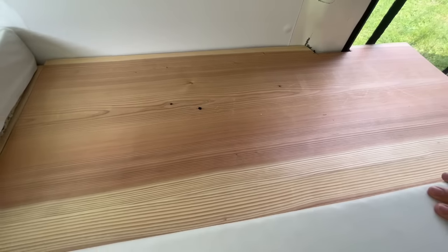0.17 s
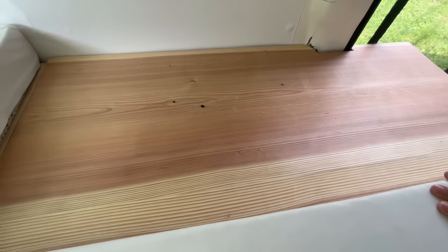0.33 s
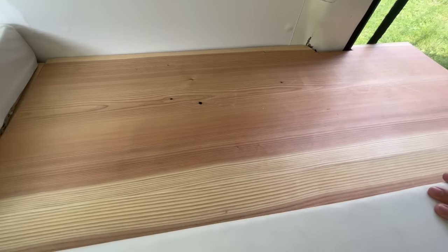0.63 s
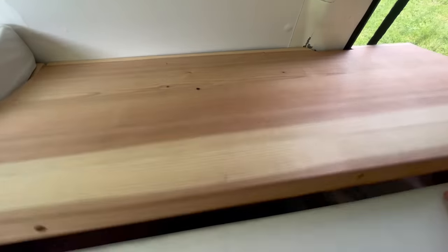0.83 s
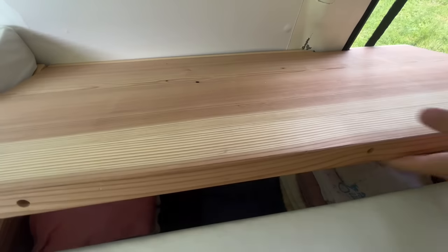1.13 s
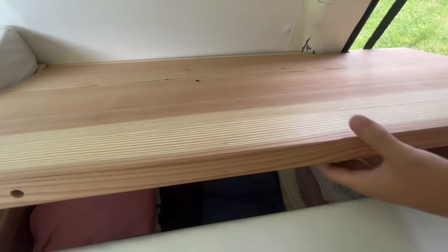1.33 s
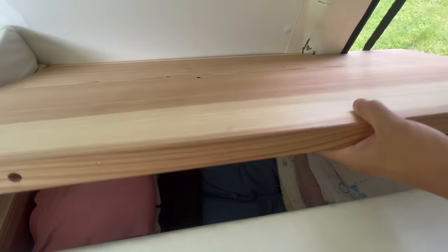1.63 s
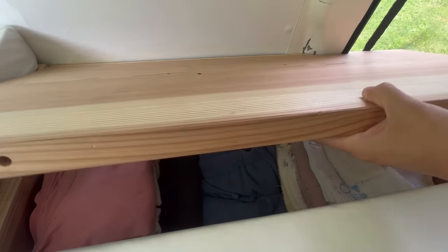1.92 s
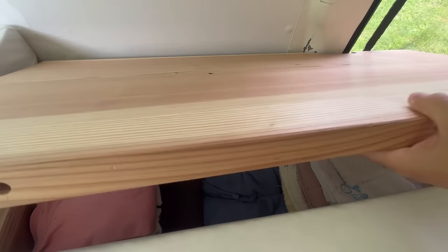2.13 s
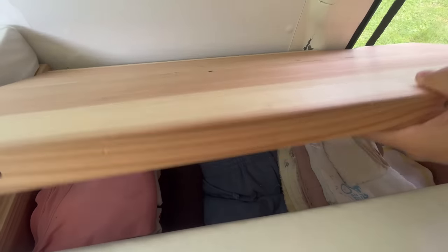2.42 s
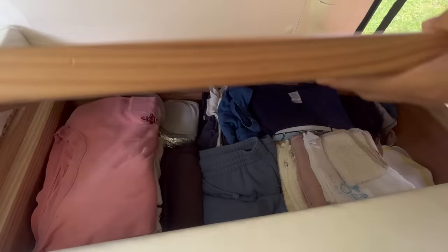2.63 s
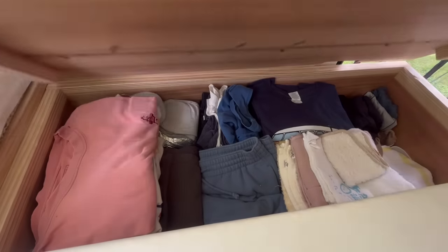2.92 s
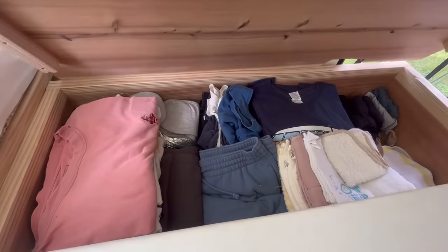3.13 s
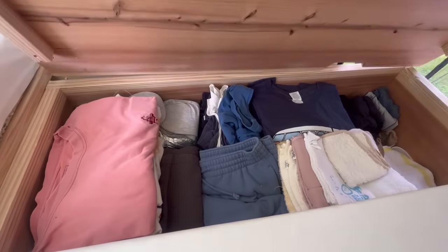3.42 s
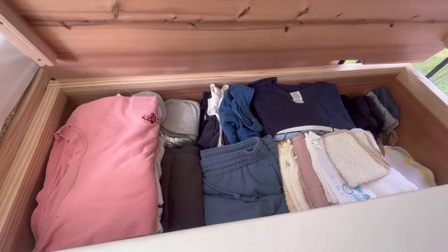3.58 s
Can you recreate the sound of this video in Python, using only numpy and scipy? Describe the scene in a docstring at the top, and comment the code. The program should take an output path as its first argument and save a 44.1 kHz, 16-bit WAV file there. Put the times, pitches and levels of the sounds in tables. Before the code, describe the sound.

A wooden storage lid clacks, bumps upward and knocks loudly against its stop in a small cabin

```python
"""Inside a small van, a pine storage lid is lifted. It clacks twice on its frame, a cushion slides and squeaks,
then the board bumps its way up and knocks against its stop. Blows are struck modes, noise bands that die away,
a falling bending-wave sweep and a boom of cabin air; squeaks and hinge are gliding chirps, sliding is
coloured noise. A high hiss and a low handling rumble lie underneath; a limiter ducks overloads."""
import sys
import numpy as np
from scipy import signal
from scipy.fft import rfft, irfft
from scipy.io import wavfile
from scipy.ndimage import uniform_filter1d, minimum_filter1d

SR = 44100
rng = np.random.default_rng(int(sys.argv[2]) if len(sys.argv) > 2 else 0)


def digitize_waveform(pressure):
    """Quantize a signal to 16-bit integers and store it at the path in sys.argv[1].

    Rows of a 2-D input are taken as channels; values are limited to [-1, 1].
    """
    field = np.atleast_2d(pressure).T
    bounded = np.clip(field, -1, 1)
    quanta = np.round(bounded * 32767).astype(np.int16)
    wavfile.write(sys.argv[1], SR, quanta)


N = 165375
T = np.arange(N) / SR


def amp(db):
    """Decibels to gain."""
    return 10 ** (np.asarray(db) / 20)


def unit(x):
    """Scale to rms 1."""
    return x / np.sqrt(np.mean(x ** 2) + 1e-20)


def at_hz(table, hz, axis=1):
    """Read a column on a log-frequency axis."""
    table = np.array(table)
    return np.interp(np.log(np.maximum(hz, 1)), np.log(table[:, 0]), table[:, axis])


def curve(table):
    """Read a level curve as gain over time."""
    return amp(np.interp(T, *np.transpose(table)))


def add(out, start_s, x):
    """Mix a sound in at a time."""
    i = max(int(start_s * SR), 0)
    out[:, i:i + x.shape[1]] += x[:, :N - i]


def pan(left_minus_right_db):
    """Left and right gains, half the difference each."""
    return amp(np.array([[.5], [-.5]]) * left_minus_right_db)


# microphone's leaning to the left: [f/Hz, left minus right/dB]
MIC_LEAN = [(70, 3.5), (180, -5.5), (350, 2), (700, 2.5), (1400, 1.5), (2800, 0), (5500, 10.5), (7500, 1.5),
            (9300, -12.5), (12000, 5.5), (15000, -2)]


def lean(hz):
    """Left minus right level of the microphone in dB at a frequency."""
    return at_hz(MIC_LEAN, hz)


RIGHT_LAG_S = 0.000439


def ear_times(delay_s):
    """Half a second of time since arrival at each microphone port."""
    return np.maximum(T[:SR // 2] - delay_s - np.array([[0], [RIGHT_LAG_S]]), 0)


# left-right likeness of noise: [f/Hz, likeness 0..1]
NOISE_LIKENESS = [(60, 0.86), (200, 0.85), (600, 0.3), (2000, 0.15), (12000, 0.13)]


def noise(left_db, right_db=None):
    """Stereo noise from spectra given as functions of frequency; alike in the bass, rms 1."""
    hz = np.fft.rfftfreq(N, 1 / SR)
    mid, side = rfft(rng.standard_normal((2, N)))
    alike = np.clip(at_hz(NOISE_LIKENESS, hz), 0, 1)
    mid = mid * np.sqrt(1 + alike)
    side = side * np.sqrt(1 - alike)
    lag = np.exp(-2j * np.pi * hz * RIGHT_LAG_S)
    left = (mid + side) * amp(left_db(hz))
    right = (mid - side) * amp((right_db or left_db)(hz)) * lag
    return unit(irfft([left, right], N))


RAGGED_DB, RAGGED_WIDTH_HZ = 5.5, 22


def ragged(x):
    """Reflections cut narrow dips between the peaks of wood and cabin; full depth from 600 Hz."""
    hz = np.fft.rfftfreq(N, 1 / SR)
    db = np.interp(hz / RAGGED_WIDTH_HZ, np.arange(4000), 1 - rng.exponential(1, 4000))
    depth = np.minimum(hz / 600, 1)
    return unit(irfft(rfft(x) * amp(RAGGED_DB * depth * db), N))


# steady high hiss: [f/Hz, left level/dB per Hz, right level/dB per Hz], relative
HISS_SPECTRUM = [(108, 4.5, 7), (430, -15.5, -15.5), (755, -10.5, -15), (1450, -14, -17),
                 (2950, -12.5, -22), (3940, -2, -8.5), (4150, 0, -10.5), (5030, 5, -1.5), (5660, 1.5, -22),
                 (6330, -2, -2.5), (7720, -10, -23), (9400, -26.5, -12.5), (10000, -41, -39.5),
                 (13650, -23.5, -22), (14700, -45, -63)]
HISS_DB, HISS_DB_PER_S = -41.5, -.5


def hiss():
    """High noise, mostly from the left, fading very slowly."""
    x = noise(lambda hz: at_hz(HISS_SPECTRUM, hz), lambda hz: at_hz(HISS_SPECTRUM, hz, axis=2))
    return amp(HISS_DB + HISS_DB_PER_S * T) * x


# handling rumble before trim: [t/s, level/dB]
RUMBLE_LEVEL = [(0.0, -45.5), (0.82, -33.5), (1.06, -47.5), (1.29, -46), (1.6, -39), (2.08, -45),
                (2.31, -51), (2.69, -40), (2.85, -46), (3.11, -46.5), (3.25, -28.5), (3.43, -42.5),
                (3.6, -33), (3.75, -43.5)]
# its spectrum: [f/Hz, level/dB per Hz], relative
RUMBLE_SPECTRUM = [(22, -37), (32, -11), (45, 6), (65, 6.5), (95, 1), (135, 5.5), (200, -6.5), (280, -8.5),
                   (400, -32), (900, -99)]
RUMBLE_TRIM_DB = -2


def rumble():
    """Handling as low noise that swells and sinks."""
    return amp(RUMBLE_TRIM_DB) * curve(RUMBLE_LEVEL) * noise(lambda hz: at_hz(RUMBLE_SPECTRUM, hz))


# sliding of cushion and hand: [t/s, level/dB]
SLIDE_LEVEL = [(0, -49), (.25, -51.5), (.38, -45.5), (.5, -47.5), (.66, -40), (.76, -40), (.88, -42.5),
               (.98, -53), (1.55, -53.5), (1.63, -46), (1.72, -52.5), (2.08, -48), (2.42, -54.5),
               (2.6, -46.5), (2.75, -40), (2.9, -53.5), (3.08, -50), (3.6, -54.5)]
# its spectrum: [f/Hz, level/dB per Hz], relative
SLIDE_SPECTRUM = [(100, 2), (300, 10.5), (800, 7), (1700, 6.5), (3000, 3.5), (6000, 2.5), (9500, -3.5),
                  (11500, -9), (15000, -23)]
# the rubbed board hums along: [f/Hz, width/Hz, level over the rub/dB]
RUBBED_BOARD = [(131, 27, 13.5), (1580, 44, 5)]


def slide(grain_db=1.5):
    """Cloth and skin rub over wood with a fine uneven grain and wake its resonances."""
    def colour(hz):
        peaks = sum(db / (1 + ((hz - centre) / width) ** 2) for centre, width, db in RUBBED_BOARD)
        return at_hz(SLIDE_SPECTRUM, hz) + peaks
    grain = amp(grain_db * unit(uniform_filter1d(rng.standard_normal(N), size=200)))
    rub = noise(lambda hz: colour(hz) + lean(hz) / 2, lambda hz: colour(hz) - lean(hz) / 2)
    return curve(SLIDE_LEVEL) * grain * ragged(rub)


BAND_EDGES_HZ = 45 * 2 ** (np.arange(23) / 2.6)


def dense_bands():
    """Bands of evened noise that stand for the countless small modes of wood and cabin."""
    white = ragged(np.array([noise(np.zeros_like), noise(np.zeros_like)]))
    bands = []
    for k, (low, high) in enumerate(zip(BAND_EDGES_HZ, BAND_EDGES_HZ[1:])):
        band_pass = signal.butter(2, [low, high], "band", fs=SR, output="sos")
        x = signal.sosfilt(band_pass, white[k % 2])
        window = int(2 * SR / (high - low)) + SR // 500
        power = uniform_filter1d(np.mean(x ** 2, axis=0), window)
        bands.append((np.sqrt(low * high), x / np.sqrt(np.abs(power) + 1e-12)))
    return bands


def contact(hz, cutoff_hz):
    """A soft contact leaves out the treble."""
    return 1 / np.sqrt(1 + (hz / cutoff_hz) ** 4)


RISE_CYCLES = 1


def envelope(t, hz, t60_s):
    """A ring builds within a cycle or so and dies away."""
    return (1 - np.exp(-t * hz / RISE_CYCLES)) * np.exp(-np.log(1000) * t / t60_s)


BEND_DELAY_100HZ_S = 0.004704


def bend_delay(hz):
    """Travel time of a bending wave in s: low ones are slower."""
    return BEND_DELAY_100HZ_S * np.sqrt(100 / hz)


def modes(table, length, cutoff_hz=np.inf):
    """Struck modes as decaying sines; low bending waves arrive later."""
    out = 0
    for hz, db, t60_s in table:
        t = ear_times(bend_delay(hz))
        ring = np.sin(2 * np.pi * hz * t) * envelope(t, hz, t60_s * length)
        uneven_db = db + rng.normal(0, 1)
        out = out + ring * amp(uneven_db) * contact(hz, cutoff_hz) * pan(lean(hz))
    return out


def dense_ring(bands, start_s, table, length, cutoff_hz=np.inf):
    """The dense part of a blow, each band dying at its own rate."""
    out, i = 0, int(start_s * SR)
    count = min(SR // 3, N - i)
    for hz, x in bands:
        t = np.maximum(T[:count] - bend_delay(hz) / 2, 0)
        gain = amp(at_hz(table, hz)) * contact(hz, cutoff_hz) * pan(lean(hz))
        out = out + x[:, i:i + count] * gain * envelope(t, hz, at_hz(table, hz, axis=2) * length)
    return out


SWEEP_START_HZ, SWEEP_OCTAVE_FALL_S = 903.7, .0035


def first_wave(swell_s):
    """A bending wave reaches the microphone treble first, as one falling sweep."""
    t = ear_times(0)
    phase = 2 * np.pi * SWEEP_START_HZ * SWEEP_OCTAVE_FALL_S * np.log1p(t / SWEEP_OCTAVE_FALL_S)
    swell = t / swell_s * np.exp(1 - t / swell_s)
    hz = SWEEP_START_HZ / (1 + t[0] / SWEEP_OCTAVE_FALL_S)
    return np.sin(phase) * swell * pan(lean(hz))


# cabin air: [f/Hz, level/dB, t60/s before the blow's length factor]
CABIN_AIR = [(49.7, -30.5, 0.083), (70.1, 2.5, 0.22), (109.4, -4, 0.2)]
BOOM_DELAY_S, BOOM_RISE_S = 0.0051, 0.006


def boom(length):
    """The cabin's air swells just after a blow."""
    t = ear_times(BOOM_DELAY_S)
    air = sum(np.sin(2 * np.pi * hz * t) * amp(db - 60 * t / (t60_s * length))
              for hz, db, t60_s in CABIN_AIR)
    return (1 - np.exp(-t / BOOM_RISE_S)) * air


# shut lid on its frame: [t/s, boom level/dB, modes level/dB, crack level/dB, ring length factor,
# first wave level/dB, snap level/dB]
LID_CLACKS = [(0.1186, -27, -25, -20, 0.92, -26, -11.5), (0.31, -21.5, -27, -20, 1.17, -26, -13.5),
              (0.332, -37, -45, -33, 0.7, -37, -35)]
# modes of the shut lid: [f/Hz, level/dB, t60/s before length factor]
SHUT_LID = [(114.2, 8, 0.19), (180, -10, 0.087), (269, 0.5, .15), (459, -6.5, .15), (657, -18, 0.073),
            (940, -3, 0.14), (1350, -19, 0.073), (1696, -4.5, 0.13), (1969, -9, .1), (2370, -15, 0.072),
            (2650, -15, 0.13), (3465, -17, .07), (4004, 7.5, 0.032), (3760, -7, 0.044), (6490, -15, .06)]
# dense ring of a hard contact: [f/Hz, level/dB, t60/s before length factor]
CRACK_RING = [(102, -10, 0.14), (312, -16, 0.24), (730, -7.5, 0.11), (1260, -15, 0.13), (2260, -3.5, 0.11),
              (3030, -24.5, 0.21), (3960, 3, 0.084), (4900, -20, 0.19), (6600, -8, 0.093), (9200, -2, 0.04),
              (12000, -19, 0.024), (15500, -19, .04)]
# instant of contact: [f/Hz, level/dB, t60/s before SNAP_LENGTH]
SNAP_RING = [(200, -19, .02), (620, 0, 0.013), (1500, -11, 0.0047), (2660, -20, 0.0048), (3790, 7.5, 0.008),
             (5900, -9, 0.0075), (9100, -10, 0.0081), (15000, -25, 0.0067)]
CLACK_SWELL_S, SNAP_LENGTH = 0.016, 0.69


def clacks(bands):
    """Hard wood-on-wood contacts of the shut lid: a snap, a bright ring and a low thud."""
    out = np.zeros((2, N))
    for start_s, boom_db, modes_db, crack_db, length, wave_db, snap_db in LID_CLACKS:
        add(out, start_s, amp(boom_db) * boom(length))
        add(out, start_s, amp(modes_db) * modes(SHUT_LID, length))
        add(out, start_s, amp(wave_db) * first_wave(CLACK_SWELL_S))
        add(out, start_s, amp(crack_db) * dense_ring(bands, start_s, CRACK_RING, length))
        add(out, start_s, amp(snap_db) * dense_ring(bands, start_s, SNAP_RING, SNAP_LENGTH))
    return out


def thumps(bands, rows, body, dense):
    """Duller blows: a first wave, then the board's ring and the cabin's boom."""
    out = np.zeros((2, N))
    for start_s, boom_db, modes_db, dense_db, cutoff_hz, length, wave_db, swell_s in rows:
        add(out, start_s, amp(boom_db) * boom(length))
        add(out, start_s, amp(modes_db) * modes(body, length, cutoff_hz))
        add(out, start_s, amp(wave_db) * first_wave(swell_s))
        add(out, start_s, amp(dense_db) * dense_ring(bands, start_s, dense, length, cutoff_hz))
    return out


# moving board: [t/s, boom level/dB, modes level/dB, dense ring level/dB, contact cut-off f/Hz,
# ring length factor, first wave level/dB, first wave swell/s]
BOARD_BUMPS = [(0.637, -25, -33.5, -44, 500, 0.68, -33, 0.0065),
               (1.322, -43, -57, -33, 3000, 0.45, -48, 0.004), (1.7, -34, -43, -39, 500, 1.23, -42, 0.0056),
               (2.222, -17, -26, -28, 1000, 1.37, -24.5, 0.016),
               (2.258, -21, -48, -39, 497, 0.76, -31.5, 0.014),
               (2.292, -51, -31.5, -31.5, 980, 0.83, -55, 0.0031),
               (2.346, -52, -56, -38, 3000, 1.7, -62, .003),
               (2.483, -16.5, -30.5, -24, 600, 1.8, -17.5, 0.0051),
               (2.512, -42, -23, -42, 700, 0.53, -24.5, 0.025),
               (2.575, -16.5, -24, -27, 960, 1.09, -26.5, 0.0059),
               (2.691, -21, -28, -21.5, 1040, 2.03, -25.5, .006),
               (2.726, -12.5, -21.5, -24.5, 1490, 0.98, -24, 0.0075),
               (2.768, -25, -23, -31.5, 1300, 1.05, -49, 0.0044),
               (2.801, -44, -30, -30.5, 1170, 1.17, -32, 0.002),
               (2.83, -49, -36.5, -40, 1300, 1.05, -34, 0.0019),
               (2.987, -46, -63, -43.5, 2250, 1.6, -55, 0.0033),
               (3.05, -24, -54, -41, 990, 1.2, -39, 0.0089),
               (3.072, -24.5, -34.5, -35, 1080, 1.14, -31, 0.019),
               (3.173, -8.5, -8, -15.5, 810, 1.03, -9, 0.0094),
               (3.275, -16, -21.5, -29, 930, 1.06, -32, 0.016)]
# modes, board low over the box: [f/Hz, level/dB, t60/s before length factor]
LOW_BOARD = [(121, -8.5, 0.12), (233, -16, 0.24), (258, -5, 0.16), (292.8, 2.5, 0.12), (345.7, -18, 0.26),
             (490.6, -9, 0.15), (610, -23.5, 0.13), (730, -7.5, 0.17), (877, -27, 0.13), (1110, -20, .11),
             (1638, -20, 0.091)]
# modes, board raised: [f/Hz, level/dB, t60/s before length factor]
RAISED_BOARD = [(161.8, -2, .16), (264.3, 5, 0.095), (367.7, -6, 0.19), (427, -10.5, 0.16),
                (476, -11.5, 0.12), (720, -28, 0.17), (955, -4, 0.095), (1070, -29, .11), (1300, -11, .12),
                (1555, -16, 0.14)]
# dense ring of the moving board: [f/Hz, level/dB, t60/s before length factor]
BOARD_RING = [(60, -19, 0.42), (155, -8.5, 0.18), (293, -2, 0.057), (417, -11, 0.093), (513, -5, 0.13),
              (606, -11.5, 0.11), (760, -7.5, 0.11), (1100, -11, 0.12), (1650, -5.5, 0.094),
              (2200, -15.5, 0.15), (8000, 2, .08)]
RAISED_S = 2.9


def bumps(bands):
    """The board knocks on its way up; its modes change once it is raised."""
    low_rows = [row for row in BOARD_BUMPS if row[0] < RAISED_S]
    raised_rows = [row for row in BOARD_BUMPS if row[0] >= RAISED_S]
    low = thumps(bands, low_rows, LOW_BOARD, BOARD_RING)
    return low + thumps(bands, raised_rows, RAISED_BOARD, BOARD_RING)


SQUEAK_JITTER, SQUEAK_FLUTTER_DB = .035, 3  # rms: pitch fraction, level
SQUEAK_ECHO_DB, SQUEAK_T60_S = -5.5, 0.099


def chirps(rows):
    """Stick-slip chirps with an unsteady pitch and a short cabin echo."""
    out = np.zeros((2, N))
    for start_s, length_s, start_hz, end_hz, db, second_db, third_db in rows:
        u = np.linspace(0, 1, int(length_s * SR))
        unsteady = unit(uniform_filter1d(rng.standard_normal((2, SR // 4)), size=50))
        wobble, flutter = unsteady[:, :len(u)]
        hz = (start_hz + (end_hz - start_hz) * u) * (1 + SQUEAK_JITTER * wobble)
        phase = 2 * np.pi * np.cumsum(hz) / SR
        swell = np.sqrt(np.abs(np.sin(np.pi * u)))
        for k, partial_db in enumerate((0, second_db, third_db), 1):
            gain = amp(db + partial_db + SQUEAK_FLUTTER_DB * flutter) * pan(lean(k * end_hz))
            add(out, start_s, gain * np.sin(k * phase) * swell)
    echo = rng.standard_normal((2, SR // 4)) * amp(-60 * T[:SR // 4] / SQUEAK_T60_S)
    echo /= np.sqrt(np.sum(echo ** 2) / 2)
    return out + amp(SQUEAK_ECHO_DB) * signal.fftconvolve(out, echo, axes=1)[:, :N]


# cushion cover: [t/s, length/s, start f/Hz, end f/Hz, level/dB, second partial/dB, third partial/dB]
CUSHION_SQUEAKS = [(.754, 0.017, 4670, 4700, -35.5, 0.5, -12), (.7625, 0.016, 6220, 5780, -25, -8, -40),
                   (.826, 0.024, 4844, 4600, -29.5, -4, -19)]


def squeaks():
    """The cushion's cover sticks and slips in high chirps."""
    return chirps(CUSHION_SQUEAKS)


# hinge and fingers, and the lid's crack on its stop at 3.488 s: [t/s, level/dB, t60/s before TICK_LENGTH, #
# left minus right/dB, emphasised f/Hz, emphasis/dB]
SHARP_TICKS = [(1.319, -40.5, 0.032, -4, 9500, 5), (1.632, -51, 0.068, -8, 9500, 13),
               (1.755, -45.5, 0.039, -10, 9400, 16.5), (2.342, -44, 0.043, -18, 1560, 18),
               (2.638, -41, .06, -1, 12000, 3), (2.698, -23, 0.1, -0.5, 9700, 6),
               (2.774, -45, 0.05, -7, 9300, 15), (2.821, -48.5, 0.11, -6, 10500, 9),
               (3.176, -57, 0.069, 7, 9000, -5), (3.488, -23, 0.012, -2.5, 3280, 13.5)]
# common spectrum: [f/Hz, level/dB]
TICK_SPECTRUM = [(1000, -31), (3300, -2.5), (6000, -10.5), (9200, -6), (11000, -12), (14000, -36),
                 (16000, -20)]
TICK_WIDTH_OCTAVES, TICK_LENGTH = 0.27, 0.64


def ticks(bands):
    """Short bright ticks of dense ring, each with its own emphasised or softened pitch region."""
    out = np.zeros((2, N))
    high = [(hz, x) for hz, x in bands if hz > TICK_SPECTRUM[0][0]]
    for start_s, db, t60_s, pan_db, peak_hz, peak_db in SHARP_TICKS:
        colour = []
        for hz, _ in high:
            octaves = np.log2(hz / peak_hz)
            emphasis_db = peak_db * np.exp(-(octaves / TICK_WIDTH_OCTAVES) ** 2)
            colour.append((hz, at_hz(TICK_SPECTRUM, hz) + emphasis_db, t60_s))
        add(out, start_s, amp(db) * pan(pan_db) * dense_ring(high, start_s, colour, TICK_LENGTH))
    return out


# hinge: [t/s, length/s, start f/Hz, end f/Hz, level/dB, second partial/dB, third partial/dB]
HINGE_CREAKS = [(2.347, 0.043, 745, 740, -47.5, -14, -25), (2.56, .1, 2920, 3030, -53, -20, -22),
                (2.648, 0.051, 2990, 3000, -39, -9, -22), (2.668, 0.036, 3300, 3430, -40, -20, -34),
                (2.738, 0.0435, 2880, 2690, -42.5, -20, -13), (2.78, .035, 2600, 2470, -62, -23, -22.5),
                (3.022, 0.031, 900, 914, -47.5, -17, -27)]


def creaks():
    """The hinge sings faintly by stick-slip."""
    return chirps(HINGE_CREAKS)


# lid brushes its stop, meets it, rebounds: [t/s, boom level/dB, modes level/dB, dense ring level/dB,
# contact cut-off f/Hz, ring length factor, first wave level/dB, first wave swell/s]
STOP_BLOWS = [(3.476, -45, -50, -29.5, 1980, 1, -39, 0.0032),
              (3.4877, -30, -15.5, -11, 1180, 1, -0.5, 0.0013),
              (3.521, -40, -16.5, -16, 630, 1, -27.5, 0.011)]
# modes of lid and stop together: [f/Hz, level/dB, t60/s before length factor]
LID_AND_STOP = [(94, -6, 0.39), (195, -26, 0.17), (250, -2, 0.096), (284, 7.5, 0.12), (385.5, -4, 0.19),
                (488, 2.5, 0.16), (579, 5, 0.08), (691, -7, 0.16), (757, -4, 0.051), (890, -23, 0.17),
                (1070, -14, .13), (1710, -12, 0.18), (1970, -17, 0.17)]
# their dense ring: [f/Hz, level/dB, t60/s before length factor]
STOP_RING = [(60, -12.5, 0.38), (150, -6.5, .2), (300, -5.5, 0.13), (490, -2.5, 0.15), (586, -15, 0.17),
             (720, -0.5, 0.078), (940, -3, 0.11), (1400, -10, 0.15), (2000, -11.5, 0.13), (3000, -11, 0.14),
             (8000, -2.5, 0.11)]


def stops(bands):
    """Lid and stop ring together when they meet."""
    return thumps(bands, STOP_BLOWS, LID_AND_STOP, STOP_RING)


def scene():
    """Everything heard in the van."""
    bands = dense_bands()
    underlay = hiss() + rumble() + slide()
    blows = clacks(bands) + bumps(bands) + stops(bands)
    return underlay + blows + squeaks() + ticks(bands) + creaks()


LIMIT, HOLD_S, RELEASE_DB_PER_S = 0.79, 0.097, 56
LOW_CUT_HZ, HIGH_CUT_HZ = 30, 15500


def record(dry):
    """A limiter ducks on overload, holds and recovers; deep bass and top are cut."""
    low_cut = signal.butter(4, LOW_CUT_HZ, "high", fs=SR, output="sos")
    dry = signal.sosfilt(low_cut, dry)
    over_db = 20 * np.log10(np.maximum(np.abs(dry).max(axis=0) / LIMIT, 1))
    half_hold = int(HOLD_S * SR) // 2
    # the hold window looks 1 ms ahead
    held_db = -minimum_filter1d(-over_db, 2 * half_hold + 1, origin=half_hold - SR // 1000)
    release_db = RELEASE_DB_PER_S * T
    duck_db = np.maximum.accumulate(held_db + release_db) - release_db
    limited = dry * amp(-uniform_filter1d(duck_db, size=64))
    high_cut = signal.ellip(10, .2, 80, HIGH_CUT_HZ, fs=SR, output="sos")
    return signal.sosfilt(high_cut, limited)


dry = scene()
out = record(dry)
digitize_waveform(out)
```